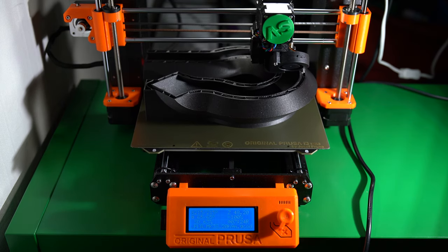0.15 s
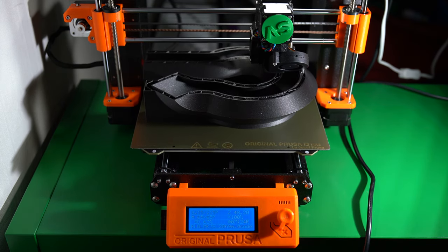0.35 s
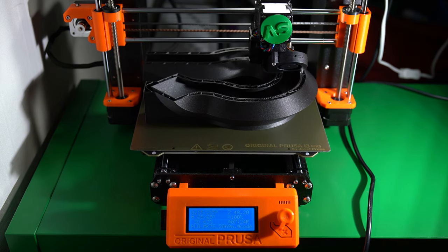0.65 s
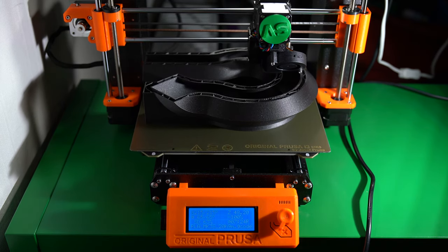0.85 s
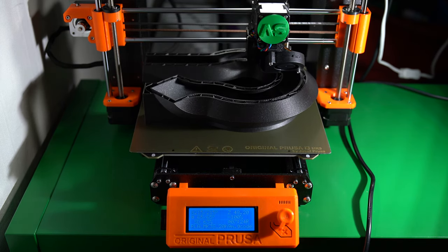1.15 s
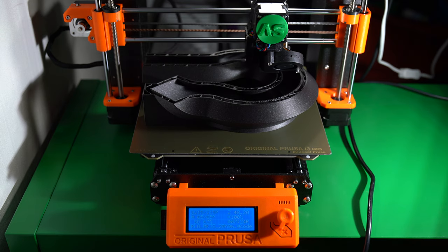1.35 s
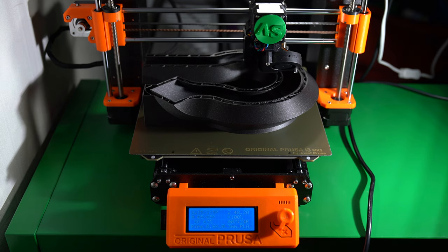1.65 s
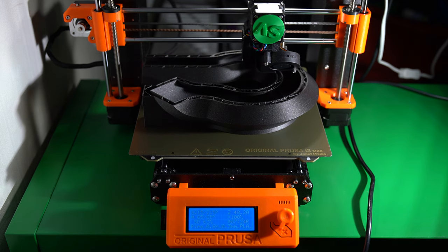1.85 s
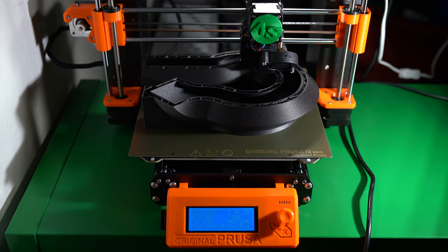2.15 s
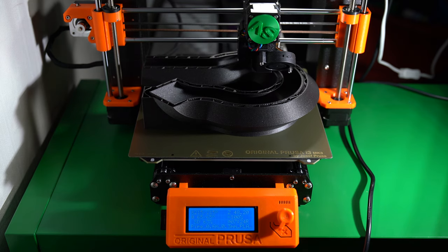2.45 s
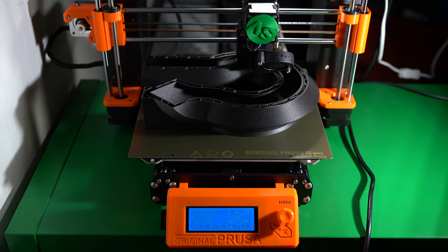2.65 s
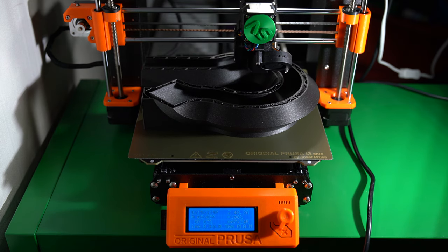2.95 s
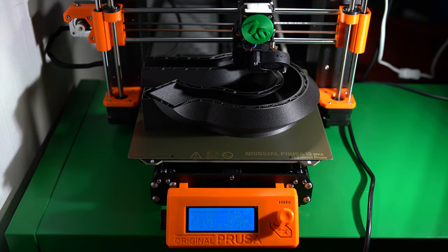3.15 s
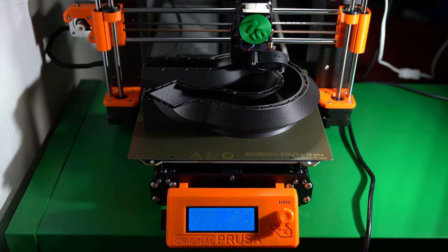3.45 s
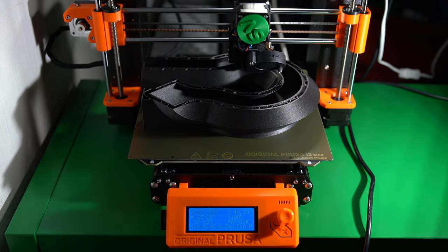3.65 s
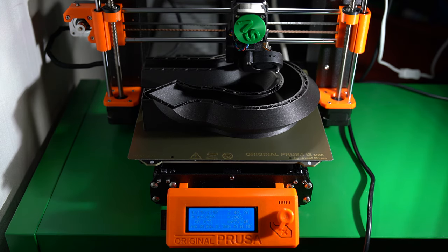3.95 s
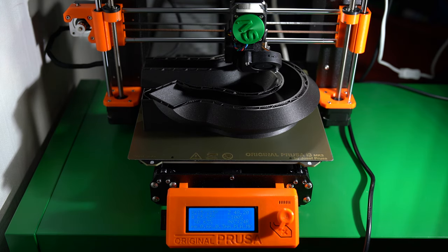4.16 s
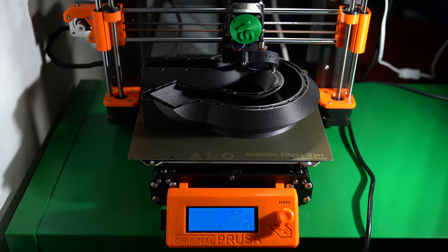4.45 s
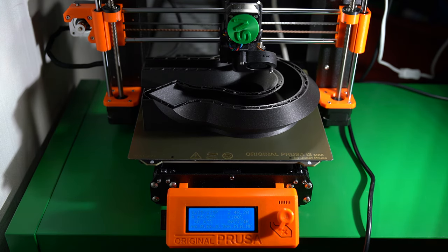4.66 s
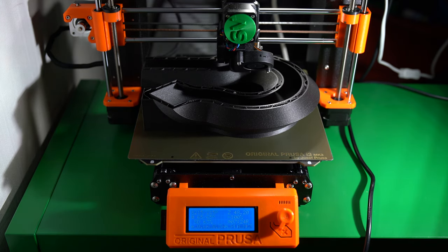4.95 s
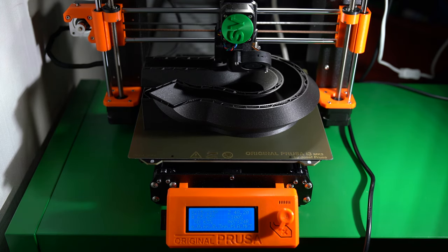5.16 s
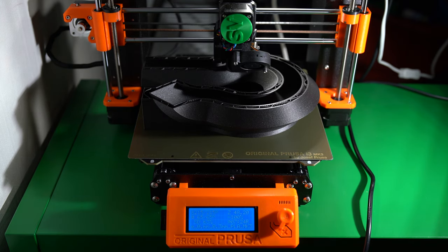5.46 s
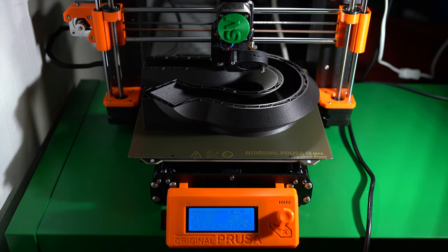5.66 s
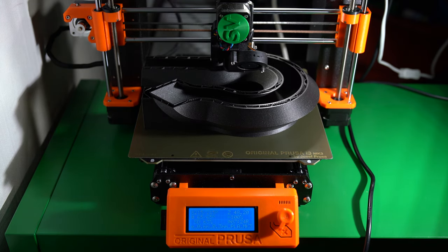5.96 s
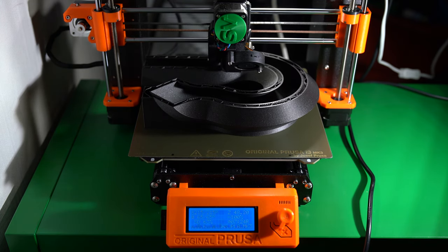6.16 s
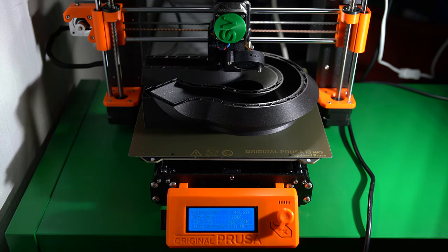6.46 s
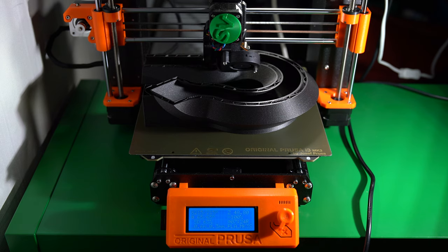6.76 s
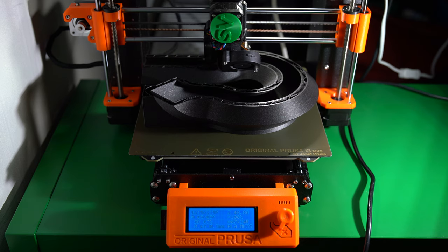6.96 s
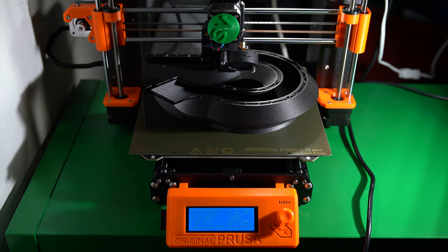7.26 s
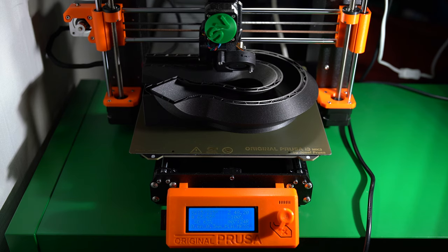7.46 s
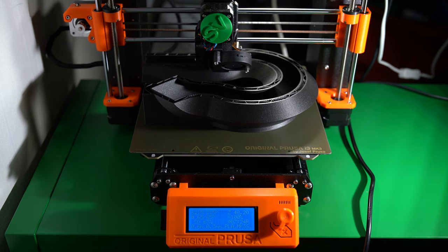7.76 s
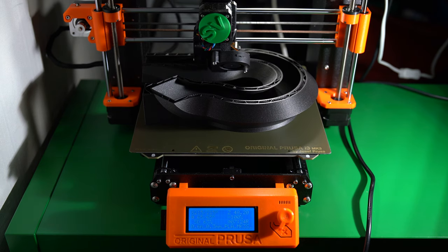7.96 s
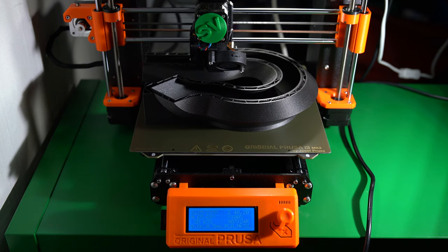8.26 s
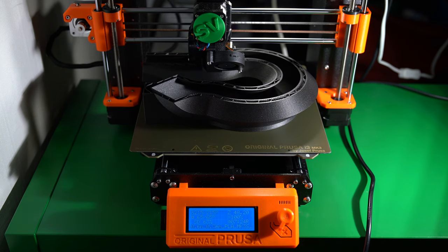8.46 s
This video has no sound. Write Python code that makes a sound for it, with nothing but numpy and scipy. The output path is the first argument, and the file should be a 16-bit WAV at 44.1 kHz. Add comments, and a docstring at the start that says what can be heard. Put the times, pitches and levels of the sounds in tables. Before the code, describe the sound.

Close to a 3D printer on a light table indoors, a stepper motor ticks fast over a strong low table throb, fan air and fine hiss. Around two seconds the carriage growls in pulses. The ticking gradually slows, then drops suddenly to a crawl with separate knocks, woody taps, short groans and airy high swoops, before abruptly picking up again.

```python
"""Small printer on a light table

Close up, one stepper motor crawls through its steps: each step ticks into the housing, each four-step coil cycle
kicks the low table modes, and noise knocks rattle the frame. Air noise, motor hiss, a low hum and driver hiss
run on below. The carriage groans as sliding tones. Where the motor is slowest, ringing knocks, woody taps and
swooping breathy whistles stand apart."""
import sys
import numpy as np
from scipy import signal
from scipy.fft import rfft, irfft
from scipy.io import wavfile
from scipy.ndimage import uniform_filter1d

SR = 44100
rng = np.random.default_rng(int(sys.argv[2]) if len(sys.argv) > 2 else 0)


def persist_wave(psi):
    """Save psi, clipped to +-1, as 16-bit WAV."""
    counts = np.round(np.clip(psi, -1, 1) * 32767).astype(np.int16)
    wavfile.write(sys.argv[1], SR, np.atleast_2d(counts).T)


def decibels_to_gain(level_db):
    """Convert a level in decibels to a linear amplitude gain (20 dB per decade)."""
    exponent = np.asarray(level_db, float) / 20
    return 10 ** exponent


N = 379701
SECONDS = np.arange(N) / SR
STEPS_A_CYCLE = 4  # full motor steps in one coil cycle


def curves(table):
    """Columns of a table, joined by straight lines in time."""
    s, *columns = np.transpose(table)
    return [np.interp(SECONDS, s, c) for c in columns]


def unit(x, span_s=None):
    """Scale to rms 1, overall or over a sliding span."""
    power = uniform_filter1d(x ** 2, int(span_s * SR)) if span_s else np.mean(x ** 2)
    return x / np.sqrt(power + 1e-12)


def resonate(x, modes):
    """Sum of resonances; neighbours swing in opposite sense."""
    out = 0
    for k, (hz, width, db) in enumerate(modes):
        b, a = signal.iirpeak(hz, hz / width, SR)
        out = out + (-1) ** k * decibels_to_gain(db) * signal.lfilter(b, a, x)
    return out


def hiss():
    """White noise, the raw material of every breath and scrape."""
    return rng.standard_normal(N)


def noise(colour):
    """Noise shaped by (frequency [Hz], density [dB]) points, scaled to rms 1."""
    hz, db = np.transpose(colour)
    f = np.arange(N // 2 + 1) * SR / N + 1
    gain = decibels_to_gain(np.interp(np.log(f), np.log(hz), db))
    return unit(irfft(rfft(hiss()) * gain, N))


def walk(rate):
    """Random levels held 1 / rate s and slewed twice."""
    k = int(SR / rate)
    held = np.repeat(rng.standard_normal(N // k + 1), k)
    return uniform_filter1d(uniform_filter1d(held, k), k)[:N]


def swell(age):
    """Rise to 1 at age 1, then a somewhat slower fall."""
    return (age * np.exp(1 - age)) ** 2


def swells(rows):
    """Envelope of short swells from (start [s], level [dB], rise [s]) rows."""
    return sum(decibels_to_gain(db) * swell(np.clip((SECONDS - s) / rise, 0, None)) for s, db, rise in rows)


# motor speed: (time [s], speed [full steps per s])
SPEED = [(0.0, 32.85), (1.0, 36.95), (1.45, 38.49), (1.9, 37.5), (2.4, 35.29), (3.1, 32.45), (4.2, 27.45),
         (5.1, 24.15), (5.481, 23.35), (5.501, 8.6), (6.7, 8.8), (7.13, 10.03), (7.15, 17.38), (7.4, 21.34),
         (8.0, 23.6), (8.61, 25.9)]


def speed():
    """Motor speed in full steps per second."""
    return curves(SPEED)[0]


def travel():
    """Full steps covered so far, starting 0.9 step into a cycle."""
    return 0.9 + np.cumsum(speed()) / SR


def crawl():
    """1 while the motor crawls below 11 steps per s, 0 when it runs above 17."""
    return np.interp(speed(), [11, 17], [1, 0])


def crawl_swing(db, place):
    """Level swing locked to the coil cycle, present only while the cycle is slow."""
    return db * crawl() * np.cos(2 * np.pi * (travel() - place) / STEPS_A_CYCLE)


def each_cycle(places, sizes, scatter_db, jitter):
    """An impulse whenever the motor passes one of the places in its coil cycle."""
    steps = travel()
    cycles = np.arange(0, steps[-1] + STEPS_A_CYCLE, STEPS_A_CYCLE)[:, None]
    chance = rng.standard_normal((len(cycles), len(places), 2))
    at = (cycles + places + jitter * chance[..., 0]).ravel()
    size = (sizes * decibels_to_gain(scatter_db * chance[..., 1])).ravel()
    inside = (at > steps[0]) & (at < steps[-1])
    out = np.zeros(N)
    np.add.at(out, np.searchsorted(steps, at[inside]), size[inside])
    return out


# colour of the broad air noise: (frequency [Hz], relative density [dB])
AIR_COLOUR = [(53, -3), (90, -11), (119, -11.5), (151, -27), (214, -14.5), (359, -24), (426, -16),
              (685, -34), (780, -29), (907, -32), (1250, -26.5), (1730, -36), (3610, -36.5), (7060, -60.5),
              (15700, -47)]
# hiss bands, motor hiss around 2.5 kHz, then upper air band: (frequency [Hz], width [Hz], relative level [dB])
MOTOR_HISS = [(2173, 145, 0), (2340, 140, 2.5), (2650, 126, 5), (3030, 380, -6.5)]
UPPER_AIR = [(3236, 670, -2), (3644, 180, 0.5), (3840, 176, -2.5)]
# upper air band: (time [s], level [dB])
UPPER_AIR_LEVEL = [(0, -63), (1.2, -56), (4, -55), (4.9, -55.5), (5.6, -54.5), (7.1, -54), (8.6, -57)]
# thin bands of air noise: (frequency [Hz], width [Hz], relative level [dB])
GRILLE = [(4940, 71, -57), (5470, 12, -42.5), (5970, 21, -46), (7900, 720, -48)]
# bearing whines, centre of their drift: (frequency [Hz], mean level [dB])
WHINE = [(3572, -72), (3877, -72), (4038, -73), (4191, -74)]


def air_and_motor_hiss():
    """Steady air noise that flickers a little, with motor hiss, an upper air band and thin bearing whines."""
    air = noise(AIR_COLOUR) * decibels_to_gain(-33 + 0.75 * walk(20))
    # the motor hiss grows with motor speed, in dB per step per s
    motor_db = -67.5 + 0.3947 * speed() + 1.8 * walk(15)
    motor_hiss = unit(resonate(hiss(), MOTOR_HISS)) * decibels_to_gain(motor_db)
    upper_air = unit(resonate(hiss(), UPPER_AIR)) * decibels_to_gain(curves(UPPER_AIR_LEVEL)[0])
    grille = resonate(resonate(hiss(), GRILLE), [(6100, 1440, 0)]) * decibels_to_gain(1.6 * walk(1.9))
    drift = np.cumsum(1 + 0.00059 * walk(2.1)) / SR  # all whines drift together
    whine = 0
    for hz, db in WHINE:
        whine = whine + np.sqrt(2) * decibels_to_gain(db + 3 * walk(1.5)) * np.sin(2 * np.pi * hz * drift)
    return air + motor_hiss + upper_air + grille + whine


def hum():
    """A narrow, unsteady low tone of filtered noise, stronger while the motor crawls."""
    settle_s = 0.69
    db = -53 + 10.5 * uniform_filter1d(crawl(), int(settle_s * SR))
    tone = resonate(resonate(hiss(), [(130.5, 12.0, 0)]), [(128, 27, 0)])
    return decibels_to_gain(db + 3.7 * walk(12)) * unit(tone)


# driver hiss colour, then burst colour: (frequency [Hz], relative density [dB])
HISS_COLOUR = [(6000, -22), (10000, -5.5), (11500, -7.5), (12300, 0), (13200, -1), (14200, -1), (15200, 12),
               (15800, -6)]
BURST_COLOUR = [(10500, -8), (12000, -11), (13500, 4), (15000, 6.5), (15700, -4), (16000, -40)]
# hiss bursts of one coil cycle: (place [steps], relative level [dB])
BURSTS = [(.17, -47), (1.04, -45), (2.44, -43), (3.63, -44.5)]


def driver():
    """The coils hiss at the top of hearing, with faint bursts at four places of the cycle at speed."""
    bed_db = -55.5 - 0.5 * crawl() + crawl_swing(3, 0.6) + 3.0 * walk(30)
    bed = noise(HISS_COLOUR) * decibels_to_gain(bed_db)
    places, db = np.transpose(BURSTS)
    starts = each_cycle(places, decibels_to_gain(db), scatter_db=0.5, jitter=0.041)
    starts = starts * decibels_to_gain(-13.5) * (1 - crawl())
    rise_s = 0.016
    shape = swell(np.arange(SR // 8) / SR / rise_s)
    bursts = noise(BURST_COLOUR) * signal.fftconvolve(starts, shape)[:N]
    return bed + bursts * decibels_to_gain(3.4 * walk(150))


# dips of the driver whistle: (time of lowest pitch [s], level [dB], lowest frequency [Hz])
DIPS = [(5.655, -47, 12500), (5.785, -47, 13600), (5.85, -51, 13300), (5.943, -49, 14300),
        (6.11, -47, 13200), (6.24, -51, 12400), (6.305, -45, 13700), (6.402, -46, 14500),
        (6.572, -48, 12500), (6.70, -50, 13300), (6.765, -48, 13800), (6.855, -47, 14500),
        (7.0, -47, 14900), (7.115, -55, 12600), (7.178, -48, 14200)]


def dips():
    """A breathy driver whistle swoops down from the top of hearing and back, with hiss above it."""
    sweep_hz_per_s, spread_s, above_db = 220000, 0.027, 5
    breath_filter = signal.butter(4, 550, fs=SR, output="sos")  # breath reaches 550 Hz either side of the pitch
    out = np.zeros(N)
    age = np.arange(-SR // 16, SR // 16) / SR
    for s, db, low_hz in DIPS:
        chance = rng.standard_normal((2, len(age)))
        hz = np.minimum(low_hz + sweep_hz_per_s * np.abs(age), 19000)
        breath = unit(signal.sosfilt(breath_filter, chance[0]))
        whistle = breath * np.sin(2 * np.pi * np.cumsum(hz) / SR)
        above_filter = signal.butter(4, low_hz + 600, "high", fs=SR, output="sos")
        above = unit(signal.sosfilt(above_filter, chance[1]))
        i = int((s + age[0]) * SR)
        envelope = decibels_to_gain(db) * np.exp(-(age / spread_s) ** 2)
        out[i:i + len(age)] += envelope * (whistle + decibels_to_gain(above_db) * above)
    return out


# dry crackles: (start [s], relative level [dB], rise [s])
CRACKLES = [(2.631, -34, 0.005), (2.673, -35.5, 0.009), (3.718, -44, 0.008)]


def crackles():
    """Brief sputters of dry treble: swelling noise with a fast random flutter."""
    grit = noise([(2500, -15), (4000, 1.5), (6000, -14), (9000, -9), (14000, -12)])
    return swells(CRACKLES) * grit * decibels_to_gain(-7.0 + 3 * walk(540))


# groans of the carriage: (start [s], level [dB], rise [s], start pitch [Hz], top pitch [Hz])
GROANS = [(5.222, -23.5, 0.018, 395, 434), (5.345, -27.5, 0.013, 396, 485), (5.485, -27.5, 0.008, 440, 488),
          (5.511, -29.5, .009, 440, 490), (5.617, -26.5, 0.03, 300, 512), (6.0, -35, 0.012, 307, 370),
          (6.066, -31.5, 0.033, 400, 500), (6.395, -26.5, 0.0062, 420, 460), (6.54, -28.5, 0.025, 370, 441),
          (6.8, -26, 0.0048, 394, 457), (7.179, -27, 0.0264, 221, 434), (7.318, -25.5, 0.017, 317.5, 434),
          (7.39, -31.5, 0.018, 301, 507), (7.491, -27, 0.018, 290, 507), (7.577, -29.5, 0.021, 335, 494)]


def groans():
    """Stick-slip on the rods: a tone and its overtones arch up and sink again, with a dry scrape."""
    dry_band = resonate(resonate(hiss(), [(1170, 530, 0)]), [(1170, 1400, 0)])
    scrape = decibels_to_gain(-24) * unit(dry_band) + decibels_to_gain(-18.5) * unit(resonate(hiss(), FRAME_UPPER))
    out = 0
    for s, db, rise, start_hz, top_hz in GROANS:
        arch = np.sin(np.clip((SECONDS - s) / rise, 0, np.pi))
        hz = start_hz + (top_hz - start_hz) * arch
        phase = 2 * np.pi * np.cumsum(hz * (1 + 0.01964 * walk(150))) / SR
        tone = np.sin(phase) + 0.1 * np.sin(2 * phase) + 0.04 * np.sin(3 * phase)
        out = out + swells([(s, db, rise)]) * decibels_to_gain(2.5 * walk(80)) * (tone + scrape)
    return out


# growl spells near top speed: (start [s], end [s], level [dB])
GROWL = [(1.62, 2.52, -25), (2.72, 3.085, -38)]


def growling():
    """Envelope of the growl: soft edges around each hold."""
    edge_s = 0.2
    out = 0
    for start, end, db in GROWL:
        inside = np.minimum(SECONDS - start, end - SECONDS)
        out = out + decibels_to_gain(db) * np.clip(inside / edge_s + 0.5, 0, 1) ** 2
    return out


def growl():
    """At speed the rods groan on every second step: the pitch arches up as the slide is quickest."""
    arch = np.cos(np.pi * (travel() - 1.35))
    hz = (380 + 75 * arch) * (1 + 0.03 * walk(120))
    phase = 2 * np.pi * np.cumsum(hz) / SR
    tone = np.sin(phase) + 0.12 * np.sin(2 * phase)
    return growling() * decibels_to_gain(6.5 * (arch - 1) + 1.5 * walk(40)) * tone


def blows(rows, modes, rasp_hz, rasp_width_hz, rasp_db, rasp_top_s):
    """Single blows: the modes ring a little differently each time, under a short rasp of noise."""
    out = np.zeros(N)
    age = np.arange(SR // 6) / SR
    rasp_band = [(rasp_hz, rasp_width_hz, 0)]
    for s, db, ring_db in rows:
        chance = rng.standard_normal((4, len(age)))
        ring = 0
        for k, (hz, t60, mode_db) in enumerate(modes):
            decay = decibels_to_gain(mode_db + 2.1 * chance[2, k]) * np.exp(-np.log(1000) * age / t60)
            mode_hz = hz * (1 + 0.013 * chance[0, k])
            ring = ring + decay * np.sin(2 * np.pi * mode_hz * age + 2 * chance[3, k])
        ring = decibels_to_gain(ring_db) * ring / np.abs(ring).max()
        rasp = unit(resonate(resonate(chance[1], rasp_band), rasp_band))
        rasp = decibels_to_gain(rasp_db) * swell(age / rasp_top_s) * rasp
        onset = np.minimum(age / 0.0008, 1)
        i = int(s * SR)
        out[i:i + len(age)] += decibels_to_gain(db) * (ring + rasp) * onset
    return out


# woody taps: (start [s], level [dB], ring re that level [dB])
TAPS = [(5.7086, -33, 7), (6.0027, -35, 4), (6.1669, -26, -1.5), (6.6278, -28.5, 3), (7.0399, -35.5, 6)]
# what a tap rings with, before its scatter: (frequency [Hz], t60 [s], relative level [dB])
TAP_RING = [(1077, 0.046, -2), (1260, 0.042, 3), (1410, 0.05, -1), (1636, 0.077, -6), (2250, 0.053, -10),
            (3600, .035, -5)]


def taps():
    """Woody taps of the crawling motor: low modes under a quick rasp."""
    return blows(TAPS, TAP_RING, rasp_hz=2000, rasp_width_hz=2600, rasp_db=-13, rasp_top_s=0.0025)


# knocks as the slow motor steps: (start [s], level [dB], ring re that level [dB])
KNOCKS = [(5.8042, -30, -7), (5.906, -40, -10), (6.262, -28, -1), (6.366, -37, -14), (6.7211, -31.5, -2),
          (7.137, -28.5, -1.5)]
# what a knock rings with, before its scatter: (frequency [Hz], t60 [s], relative level [dB])
KNOCK_RING = [(2090, .045, -4), (2234, .06, -5), (2410, .05, -3), (2480, 0.075, 0.5), (2570, .04, -1),
              (2950, 0.04, -4), (3540, .035, -3), (7700, .04, -14)]


def knocks():
    """Bright knocks of the crawling motor: high modes under a wide rasp."""
    return blows(KNOCKS, KNOCK_RING, rasp_hz=2600, rasp_width_hz=8500, rasp_db=-11, rasp_top_s=0.005)


# ticks of one coil cycle: (place [steps], relative level [dB])
TICKS = [(0.01, -35.5), (0.919, -38), (1.969, -35.5), (2.876, -37)]
# housing ring of a tick, then its treble: (frequency [Hz], width [Hz], relative level [dB])
HOUSING = [(1235, 300, 4.5), (2520, 104, 8), (2833, 64, 9)]
TICK_EDGE = [(3980, 750, -4.5), (6030, 1130, -11), (7680, 680, -9), (11340, 2900, -12)]


def ticks():
    """Each full step snaps: a click and a brief noise tail into the motor housing, which rings more at speed."""
    places, db = np.transpose(TICKS)
    snaps = each_cycle(places, decibels_to_gain(db), scatter_db=2.0, jitter=0.03)
    snaps = snaps * decibels_to_gain(3.5 - 8 * crawl())  # softer while crawling
    decay_s = 0.0029
    tail = signal.lfilter([1], [1, -np.exp(-1 / (decay_s * SR))], snaps)
    snap = decibels_to_gain(13) * snaps + tail * hiss()  # clean edge above the noisy tail
    ring_db = 0.16 * (speed() - 27.5)
    return resonate(snap * decibels_to_gain(ring_db), HOUSING) - resonate(snap, TICK_EDGE)


# frame rattle: (time [s], rattle [dB], lower modes re rattle [dB], upper modes re rattle [dB])
RATTLE = [(0, -34, -3.5, -16), (.5, -38.5, -1, -19), (.75, -34.5, -4, -18.5), (1.1, -37.5, -1.5, -17),
          (1.6, -34, 0.5, -16.5), (1.95, -26, -12.5, -18), (2.4, -30.5, -5.5, -13), (2.62, -37.5, -1, -16),
          (2.8, -33, -10, -18), (3.4, -40, -8, -17), (4, -39.5, -4, -19.5), (5.1, -37.5, -4.5, -19),
          (5.6, -35.5, -2, -17.5), (6.3, -36, -3, -14), (7.05, -40, -0.5, -17.5), (7.4, -33, -4.5, -13.5),
          (7.9, -37.5, -4, -22), (8.6, -35.5, -5.5, -14.5)]
# lower, middle and upper frame modes: (frequency [Hz], width [Hz], relative level [dB])
FRAME_LOWER = [(199.4, 12.7, -4), (244.2, 9.8, -0.5)]
FRAME_MIDDLE = [(305.5, 24.5, -2), (345.6, 14, 0.5), (390.5, 18, -2), (425.7, 16, 1), (487.5, 38, -6)]
FRAME_UPPER = [(594, 51, -5), (785.5, 27, -5), (1058, 26, -5), (1430, 200, -26)]


def frame():
    """Loose parts chatter in dense uneven knocks; the middle and upper modes throb twice a coil cycle."""
    rattle_db, lower_db, upper_db = curves(RATTLE)
    hits = rng.random(N) < 2000 / SR  # about 2000 a second
    grains = hits * decibels_to_gain(2.0 * rng.exponential(size=N)) * hiss()
    locked = growling() / growling().max()  # the growl steadies the chatter and deepens its throb
    depth_db = 0.4 + 7 * locked
    throbs = grains * decibels_to_gain(depth_db * np.cos(np.pi * (travel() - 1.1)))
    edges = signal.butter(3, [180, 540], "band", fs=SR, output="sos")
    lower = unit(signal.sosfilt(edges, resonate(grains, FRAME_LOWER)), 0.14)
    middle = unit(signal.sosfilt(edges, resonate(throbs, FRAME_MIDDLE)), 0.101)
    upper = unit(resonate(resonate(throbs, FRAME_UPPER), [(790, 310, 0)]), 0.49)
    swing_db = crawl_swing(2.5, 2.93) + 4.34 * walk(16) * (1 - locked)
    throbbing = decibels_to_gain(swing_db) * (middle + decibels_to_gain(upper_db) * upper)
    return decibels_to_gain(rattle_db) * (throbbing + decibels_to_gain(lower_db + 2.16 * walk(10)) * lower)


# table shake, before its slow swing: (time [s], level [dB])
SHAKE = [(0.0, -8.5), (0.09, -19.5), (0.14, -8), (0.19, -24.5), (0.26, -2), (0.31, -25.5), (0.38, -9),
         (0.45, -24.5), (0.5, -11.5), (0.6, -31), (0.67, -14), (0.79, -27), (0.84, -16.5), (1.22, -20),
         (1.25, -12.5), (2.3, -14), (2.35, -21), (2.82, -15.5), (3.31, -21.5), (3.4, -10.5), (3.64, -25.5),
         (3.74, -14.5), (3.78, -19), (4.58, -16.5), (4.69, -22.5), (4.74, -14), (5.05, -17), (5.1, -28),
         (5.25, -17), (5.31, -26), (5.41, -17), (5.51, -22.5), (5.68, -12.5), (5.8, -32.5), (5.94, -18.5),
         (6.44, -23.5), (6.49, -6), (6.54, -23), (6.61, -16.5), (6.82, -26.5), (6.95, -8), (7.14, -28),
         (7.21, -13.5), (7.69, -23), (7.76, -13.5), (7.81, -23.5), (7.97, -13), (8.05, -27), (8.09, -18),
         (8.29, -15.5), (8.31, -27.5), (8.43, -9.5), (8.5, -20), (8.6, -14.5)]
# modes of the table top: (frequency [Hz], width [Hz], relative level [dB])
TABLE_TOP = [(33.7, 5.4, -9), (44.4, 17.2, -7.5), (52.2, 4.4, 3), (56.48, 4.55, 9), (63.5, 7, 0),
             (70.4, 3.37, 1), (75.9, 8.7, -10.5)]
# legs rocking: (frequency [Hz], width [Hz], relative level [dB])
SWAY = [(17.8, 3.1, -40)]
# unevenness of the pull over one coil cycle, its last level held above:
# (multiple of the cycle rate [1], relative level [dB])
PULL = [(2, 19), (3, 15), (4, 3), (5, 7.5), (6, 8.5), (7, 7), (8, 4), (9, 4), (10, -1.5), (11, 3), (12, 7),
        (14, -0.5)]
# loose shaking against the locked: (motor speed [steps per s], relative level [dB])
LOOSE_SHARE = [(10, 8), (20, -2), (30, -5), (33, -10), (36, -11)]


def table():
    """The uneven pull of the coils, plus loose shaking, rings the table top and rocks its legs."""
    jolt_place = -0.5196  # steps into the cycle at which the low multiples line up
    turn = 2 * np.pi * (travel() - jolt_place) / STEPS_A_CYCLE
    multiples = np.arange(2, 41)
    lag = 0.3 * np.clip(multiples - 6, 0, None) ** 2  # high multiples spread over the cycle, not one thump
    pull_db = np.interp(multiples, *np.transpose(PULL))
    pull = sum(decibels_to_gain(db) * np.cos(k * turn - a) for k, a, db in zip(multiples, lag, pull_db))
    # the top follows neither slow nor fast shaking
    top = signal.butter(4, [34, 84], "band", fs=SR, output="sos")
    locked = unit(signal.sosfilt(top, resonate(pull, TABLE_TOP)), 0.14)
    loose = resonate(resonate(hiss(), TABLE_TOP[1:]), [(59.6, 86, 0)])
    loose = unit(signal.sosfilt(top, loose))
    loose_db = np.interp(speed(), *np.transpose(LOOSE_SHARE))
    shaking = unit(locked + decibels_to_gain(loose_db) * loose, 0.2)
    shake_db = curves(SHAKE)[0] + crawl_swing(-3, 5.3)
    rocking = resonate(resonate(pull, SWAY), [(7.0, 14.0, 0)])
    return decibels_to_gain(shake_db) * shaking + rocking


def scene():
    """Everything reaches the one microphone from close by."""
    background = air_and_motor_hiss() + hum() + driver() + dips() + crackles()
    carriage = groans() + growl()
    motor = taps() + knocks() + ticks()
    return (background + carriage + motor + frame() + table())[None]


def roll_off(x):
    """The treble ends steeply here."""
    return signal.sosfilt(signal.butter(12, 17070, fs=SR, output="sos"), x)


def record(dry):
    """The microphone drops the deepest bass, and a steep filter cuts the top."""
    foot = signal.butter(2, 11, "high", fs=SR, output="sos")
    top = signal.ellip(10, 0.3, 70, 15700, fs=SR, output="sos")
    mix = signal.sosfilt(np.vstack([foot, top]), dry)
    return roll_off(mix)


dry = scene()
out = record(dry)
persist_wave(out)
```